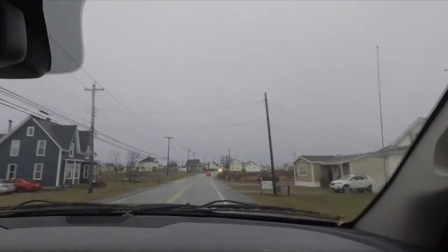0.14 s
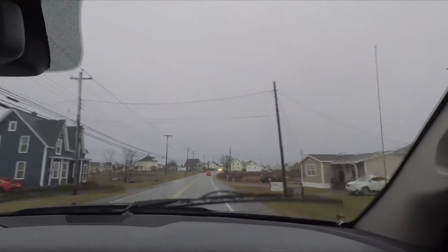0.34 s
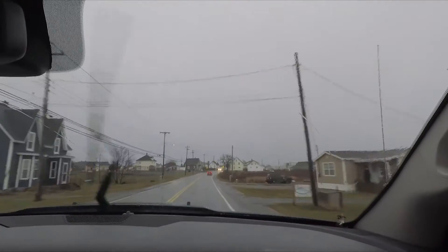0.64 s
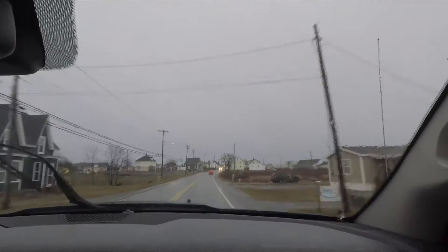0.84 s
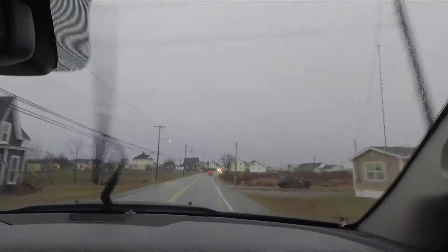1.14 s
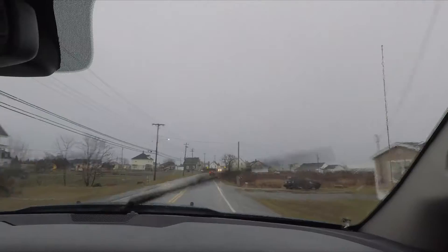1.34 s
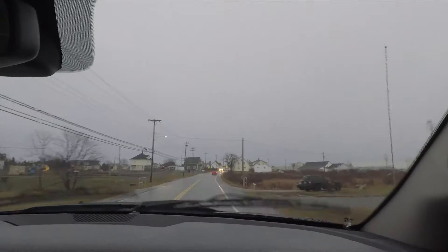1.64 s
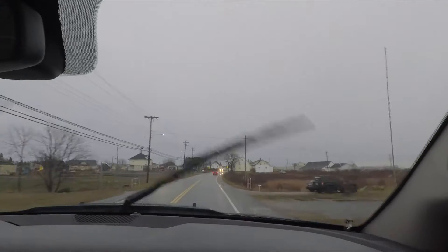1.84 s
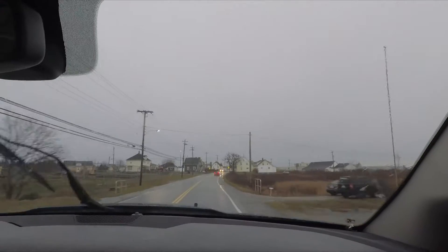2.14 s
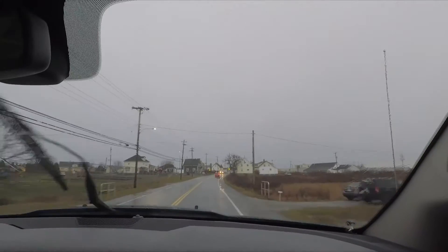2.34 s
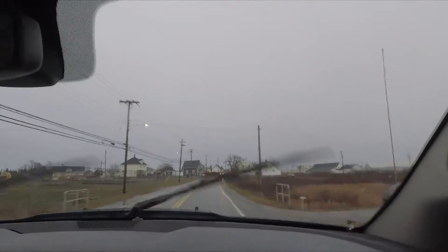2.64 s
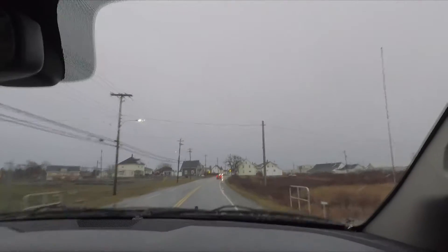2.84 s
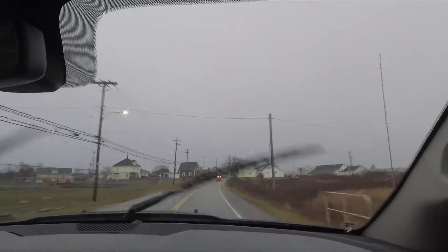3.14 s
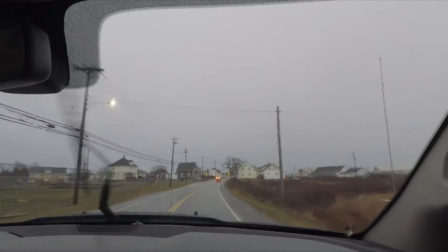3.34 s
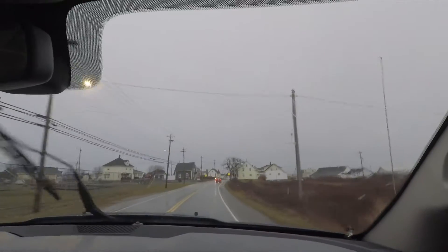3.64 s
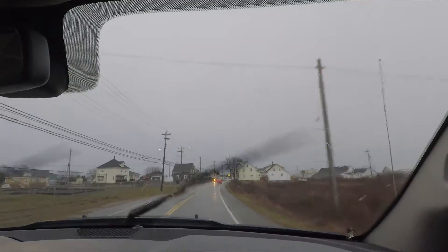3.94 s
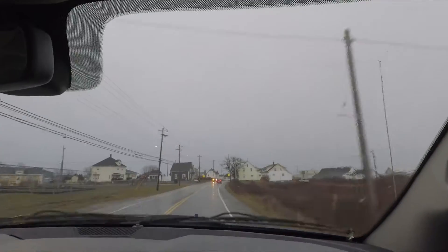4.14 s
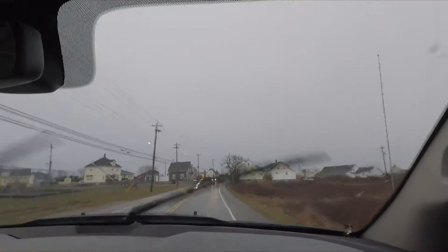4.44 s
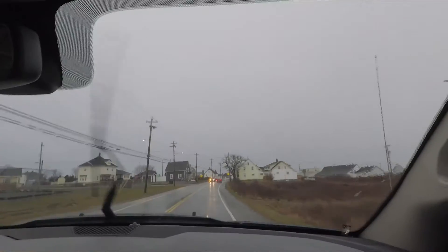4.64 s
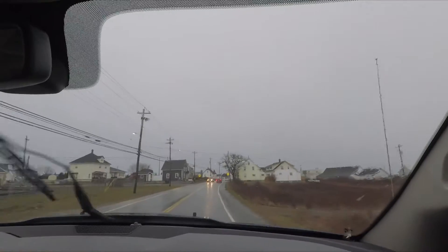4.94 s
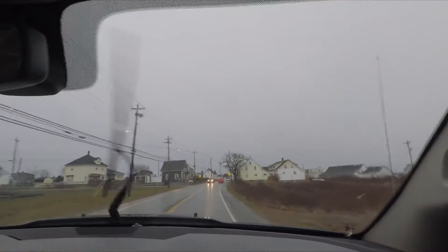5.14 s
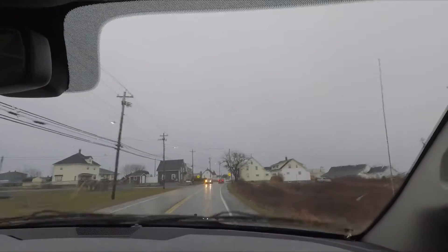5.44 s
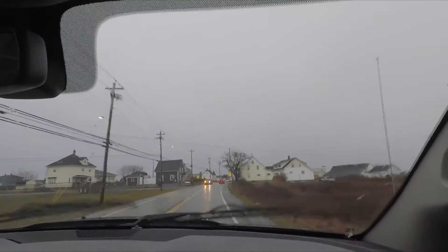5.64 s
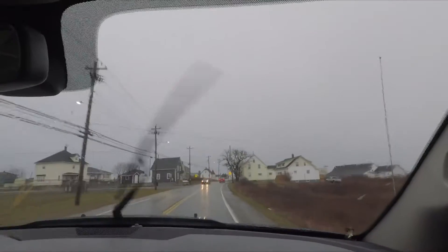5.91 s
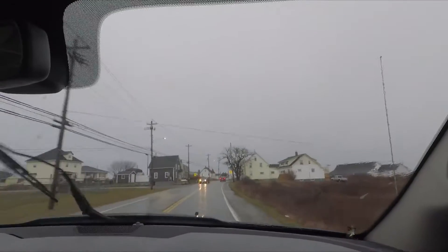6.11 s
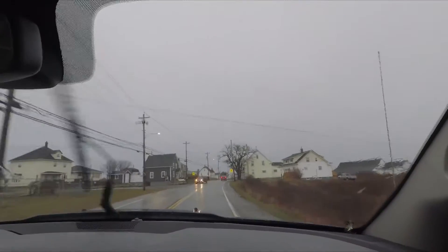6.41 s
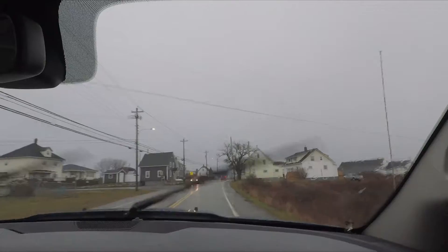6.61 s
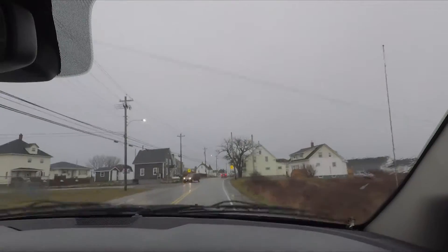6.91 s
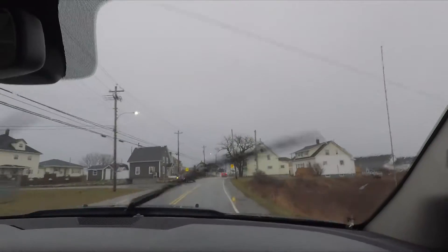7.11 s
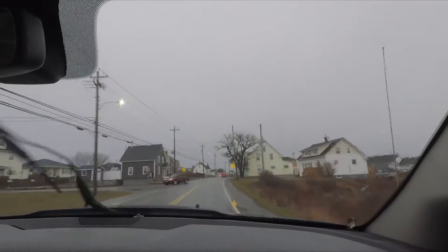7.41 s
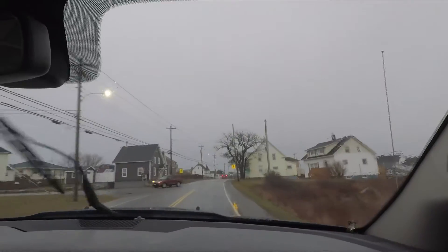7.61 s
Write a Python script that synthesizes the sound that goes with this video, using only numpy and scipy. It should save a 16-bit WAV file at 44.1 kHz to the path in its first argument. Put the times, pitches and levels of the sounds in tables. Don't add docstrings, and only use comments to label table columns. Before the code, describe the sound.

Close stereo cabin sound from near the windscreen: uneven rain crackles on glass in bursts and tiny lulls, with heavy drops popping out in front and softer ones on the side windows. Below it, constant low rumble, muted engine drone and thin wet-tyre hiss. One strong hollow knock comes early, fainter knocks follow, and a rough patch late on brings several quick body thuds.

```python
import sys
import numpy as np
from scipy import signal
from scipy.io import wavfile
from scipy.ndimage import uniform_filter1d

SR = 44100
rng = np.random.default_rng(int(sys.argv[2]) if len(sys.argv) > 2 else 0)


def persist_wave(psi):
    counts = np.round(np.clip(psi, -1, 1) * 32767).astype(np.int16)
    wavfile.write(sys.argv[1], SR, np.atleast_2d(counts).T)


def how_loud(loudness_db):
    steps = np.asarray(loudness_db, float) / 20
    return 10 ** steps


N = 342636

# start_s, rumble_db, roar_db
DRIVE = [(0.0, -16, -25), (0.24, -14.5, -29.5), (0.5, -17, -27), (0.65, -19.5, -29), (2.08, -16.5, -29),
         (2.38, -16.5, -29.5), (2.88, -15, -30.5), (3.35, -17.5, -28), (3.4, -15.5, -29.5),
         (4.48, -18.5, -29.5), (4.57, -19, -32.5), (4.65, -16, -29.5), (6.54, -17, -30), (6.62, -18, -29),
         (6.71, -14.5, -30), (7.53, -18.5, -29), (7.66, -12, -29), (7.77, -31, -30)]
# start_s, peak_db, left_minus_right_db, brightness_db
WINDSCREEN_DROPS = [(0.137, -8, 0, -2.5), (0.4682, -26, 0.5, -1.5), (0.6601, -18, -0.5, -3),
                    (0.7525, -18.5, 1, -2), (0.8277, -14.5, -5, -15.5), (0.8707, -17, -3, -4.5),
                    (1.2052, -16, 3.5, -4.5), (1.3521, -10.5, 0, -9.5), (1.4814, -10.5, -4, -7.5),
                    (1.6708, -21, 1.5, 0), (1.7896, -18, 0, -1.5), (1.9366, -20.5, 0.5, -5),
                    (2.1911, -19.5, -2, -11), (2.2563, -14, -5, -18), (2.5126, -19.5, -3, -4.5),
                    (2.6764, -17.5, -1, -11.5), (2.746, -10, 0.5, -0.5), (3.016, -17.5, 2, -11),
                    (3.3933, -14, 0.5, -15.5), (4.041, -19.5, 5, -3.5), (4.3442, -17.5, -0.5, -4.5),
                    (4.5077, -18, -5.5, -7), (4.9913, -18.5, -2, -5.5), (5.4008, -21, 7, -11.5),
                    (5.639, -15.5, -2, -12), (5.7982, -22.5, 9, -3.5), (6.2015, -17.5, -2.5, -6),
                    (6.917, -17.5, -4.5, -9.5), (7.25, -17.5, -2.5, -8), (7.4277, -19, 1.5, -12)]
# start_s, peak_db, left_minus_right_db
SIDE_DROPS = [(0.2089, -22.5, -1.0), (0.2663, -34.5, 1.0), (0.5225, -18, 1.0), (1.0829, -17, -2),
              (1.1308, -21, 1.0), (1.4112, -21, 0.0), (1.5549, -20, 0.0), (2.0412, -20, -1),
              (2.2958, -15.5, -0.5), (2.3857, -20, -1), (2.9143, -24, 2.0), (3.243, -20.5, 1.0),
              (3.46, -20, 0.5), (3.6214, -22, -3), (3.7938, -19, -4), (3.894, -24, -2), (4.2355, -20.5, -4),
              (4.4288, -21, 1.5), (4.643, -27, -2), (4.8905, -20.5, -4), (5.222, -28, 0.5),
              (5.456, -18, 1.5), (5.5756, -20.5, -1), (6.0122, -27.5, 9), (6.1459, -20.5, -1),
              (6.2567, -26.5, -3), (6.6143, -20, -4), (6.7503, -18.5, 0.5), (6.9729, -17.5, -1),
              (7.3118, -20.5, -0.5)]


def rms_one(x):
    return x / np.sqrt(np.mean(x ** 2) + 1e-20)


def in_time(rows):
    s, *columns = np.transpose(rows)
    return [np.interp(np.arange(N) / SR, s, c) for c in columns]


def at_hz(points, hz):
    table_hz, value = np.transpose(points)
    return np.interp(np.log(hz), np.log(table_hz + 1), value)


def swells(rows):
    t = np.arange(N) / SR
    return sum(db * np.exp(-((t - s) / length_s) ** 2) for s, db, length_s in rows)


def drift(rate):
    r = np.exp(-80 * np.pi * rate / SR)
    noise = rng.standard_normal(N // 40 + 2002)
    slow = signal.lfilter([1], [1, -2 * r, r * r], noise)[2000:]
    return np.interp(np.arange(N) / 40, np.arange(len(slow)), rms_one(slow))


def ports_db(left_minus_right_db):
    return left_minus_right_db * np.array([[.5], [-.5]])


def add(out, s, sound):
    start = int(s * SR)
    out[:, start:start + sound.shape[1]] += sound[:, :N - start]


def bands(spectrum, size, envelope, count=3):
    # band_hz, side_minus_mid_db
    width_db = [(15, -14), (35, -10.5), (52, -6), (65, 3), (120, -20), (300, -13.5), (510, -10.5),
                (870, -2), (1480, -.5), (2530, -4), (4320, -8), (6500, -1.5), (8500, 5.5), (13000, 4)]
    # band_hz, left_minus_right_db
    balance_db = [(15, -7.5), (35, -8.5), (45, -0.5), (55, 0.5), (70, 1), (300, 2.5), (870, -0.5),
                  (2530, -.5), (4320, 1), (6500, 1), (8500, -7), (11000, 9.5)]
    edges = spectrum[0][0] * 2 ** (np.arange(40) / count)
    edges = edges[edges < min(spectrum[-1][0] * 1.2, .45 * SR)]
    white = rng.standard_normal((2, 2, size))
    out = 0
    for k, (low, high) in enumerate(zip(edges, edges[1:])):
        hz = np.sqrt(low * high)
        sos = signal.butter(2, [low, high], "band", fs=SR, output="sos")
        mid, side = signal.sosfilt(sos, white[k % 2] * envelope(hz))
        ports = mid + how_loud(at_hz(width_db, hz)) * side * [[1], [-1]]
        out = out + how_loud(at_hz(spectrum, hz)) * ports * how_loud(ports_db(at_hz(balance_db, hz)))
    return out


def steady(spectrum, patchy_db, rate):
    together = drift(rate)
    return rms_one(bands(spectrum, size=N, envelope=lambda hz: how_loud(patchy_db * (0.11 * together + drift(rate)))))


def body_rumble():
    # band_hz, density_db_per_hz
    rumble_spectrum = [(11, -27), (15, 1.5), (25, -4), (35, 4.5), (50, -2.5), (62, -1), (75, -3.5),
                       (90, -0.5), (105, -6.5), (125, -3.5), (150, -12), (200, -35), (260, -23)]
    rumble_db, _ = in_time(DRIVE)
    return how_loud(rumble_db + 1.0) * steady(rumble_spectrum, patchy_db=1.93, rate=4.3)


def road_roar():
    # band_hz, density_db_per_hz
    roar_spectrum = [(59, -32.5), (100, 0), (133, -7.5), (210, -12.5), (330, -16), (584, -27.5), (776, -29),
                     (989, -36.5), (1490, -41), (3000, -48), (3900, -66.5), (6600, -120)]
    # centre_s, rise_db, length_s
    jolts = [
        (6.73, 8, .05),
        (7.16, 6.5, .05),
    ]
    _, roar_db = in_time(DRIVE)
    return how_loud(roar_db + 5.5 + swells(jolts)) * steady(roar_spectrum, patchy_db=1.2, rate=15.0)


def spray():
    # band_hz, density_db_per_hz
    spray_spectrum = [(2000, -11), (4000, -1.5), (6200, -2), (8000, -4), (10000, -6.5), (12500, -23.5),
                      (15000, -30)]
    return how_loud(-52) * steady(spray_spectrum, patchy_db=3.0, rate=8.7)


def engine():
    # start_s, firing_hz, level_db
    firing = [(0, 63.4, -24.5), (1.0, 63.3, -21), (2.2, 63, -24), (3.5, 63.13, -28), (5.0, 63.1, -20.5),
              (6.5, 62.62, -36.5), (7.77, 62, -27.5)]
    # start_s, boom_hz, level_db
    boom = [(0.0, 123.8, -31), (0.97, 124.4, -19.5), (1.23, 116.1, -30), (1.67, 125.6, -20),
            (1.77, 116.2, -25.5), (1.9, 126.7, -19), (2.49, 127.3, -34), (3.22, 116.3, -26.5),
            (3.4, 121, -22), (5.52, 125.3, -21), (7.66, 112, -19), (7.77, 116, -20.5)]
    flutter_db = 2.5
    out = 0
    for table, wander_hz in ((firing, .8), (boom, 2.76)):
        hz, level_db = in_time(table)
        phase = 2 * np.pi * np.cumsum(hz + wander_hz * drift(5.52)) / SR
        out = out + how_loud(level_db + 2.5 + flutter_db * drift(5.4)) * np.sin(phase)
    return out * how_loud(ports_db(1.8))


def tap(splat_t60, cabin_db, spread_s):
    # band_hz, density_db_per_hz
    glass_spectrum = [(500, -19.5), (700, 0), (1500, -4), (2200, -1.5), (2850, 1), (3500, 3.5), (4400, -2),
                      (5800, 1.5), (6600, -1), (7600, -10.5), (9700, -25.5), (11200, -47), (13000, -35),
                      (16000, -59.5)]
    # band_hz, t60_s
    cabin_t60 = [(800, 0.17), (2600, 0.083), (7000, 0.039), (14000, .07)]
    t = np.arange(int(.16 * SR)) / SR
    ticks = np.repeat(how_loud(5.4 * rng.standard_normal(len(t) // 20 + 1)), 20)[:len(t)]
    splat = ticks * how_loud(-60 * t / splat_t60) * (1 - np.exp(-t / spread_s))
    build_up = 1 - np.exp(-t / 0.0099)

    def shape(hz):
        return splat + how_loud(cabin_db - 60 * t / at_hz(cabin_t60, hz)) * build_up

    sound = bands(glass_spectrum, size=len(t), envelope=shape, count=5)
    return sound / np.mean(np.max(np.abs(sound), axis=1))


def middling_drops(patter_db):
    per_s, clearing_db, clearing_s = 18, 20, .02
    count = int(per_s * N / SR)
    listed = [*WINDSCREEN_DROPS, *SIDE_DROPS]
    clearings = swells([(row[0] - clearing_s / 2, clearing_db, clearing_s) for row in listed])
    flow = np.cumsum(how_loud(patter_db - uniform_filter1d(patter_db, size=SR // 2) - clearings))
    at = np.searchsorted(flow, (np.arange(count) + rng.random(count)) / count * flow[-1])
    size, side, bright = np.clip(rng.standard_normal((count, 3)), -2, 1).T
    peak_db = patter_db[at] + 11.5 + 3.5 * size
    return np.transpose([at / SR, peak_db, 1.5 + 3 * side, -9 + 6 * bright])


def rain():
    # start_s, patter_db
    thickness = [(0.0, -38), (0.34, -39.5), (0.73, -37.5), (0.82, -39.5), (1.45, -40), (2.01, -38),
                 (2.51, -44), (3.33, -41), (4.02, -44), (4.5, -41.5), (4.67, -42.5), (6.17, -40),
                 (6.56, -43.5), (6.9, -42), (7.25, -44.5), (7.77, -43)]
    # centre_s, depth_db
    lulls = [(.125, 8), (0.224, 8), (.396, 6), (.693, 9), (0.959, 14), (1.317, 5), (1.447, 5), (1.611, 12),
             (1.655, 6), (1.92, 6), (2.076, 5.5), (2.357, 8), (2.73, 7), (2.988, 6), (3.515, 6), (3.976, 8),
             (4.22, 9.5), (4.749, 11), (5.333, 7), (5.719, 9), (5.917, 15), (6.182, 7), (6.376, 13),
             (6.555, 12), (6.655, 8), (6.888, 7), (7.235, 7), (7.373, 20), (7.448, 11)]
    lull_s, lull_lead_s, side_bright_db = .022, .013, -10.5
    spots = [tap(splat_t60=0.027, cabin_db=-4.5, spread_s=0.00019 * how_loud(20.0 * u)) for u in np.linspace(-1, 1, 16)]
    near = [tap(splat_t60=0.017, cabin_db=-3.0, spread_s=0.0001) for _ in range(8)]

    patter_db, = in_time(thickness)
    patter_db = patter_db + 3.5 - swells([(s - lull_lead_s, db, lull_s) for s, db in lulls])
    falls = rng.random(N) < 380 * how_loud(1.5 * drift(12.0)) / SR
    sizes = falls * how_loud(3.5 * np.minimum(rng.exponential(1, N), 3.5))
    patter = rms_one(sizes) * how_loud(patter_db - 14.0)
    dealt = rng.integers(0, 16, N)
    out = sum(signal.fftconvolve([patter * (dealt == k)], spot, axes=1)[:, :N] for k, spot in enumerate(spots))

    side_drops = [(*row, side_bright_db) for row in SIDE_DROPS]
    middling = middling_drops(patter_db)
    for drops, struck in ((WINDSCREEN_DROPS, near), (side_drops, spots), (middling, spots[:8] + near)):
        treble = signal.sosfilt(signal.butter(2, 4800, "high", fs=SR, output="sos"), struck)
        bass = signal.sosfilt(signal.butter(2, 4800, "low", fs=SR, output="sos"), struck)
        for (s, peak_db, pan_db, bright_db), k in zip(drops, rng.integers(0, len(struck), len(drops))):
            sound = bass[k] * how_loud(-.4 * (bright_db + 11.0)) - treble[k] * how_loud(0.7 * (bright_db + 9.5))
            add(out, s, sound * how_loud(peak_db - 1.75 + ports_db(pan_db)))
    return out


def roof():
    # start_s, peak_db
    roof_drops = [(0.058, -12), (0.139, -39), (0.509, -18), (0.713, -13.5), (2.676, -16.5), (2.963, -16),
                  (3.582, -22.5), (4.943, -23.5), (5.812, -18.5), (6.742, -22.5), (7.168, -35), (7.43, -20)]
    # band_hz, density_db_per_hz
    lining_spectrum = [(300, -16), (450, 0), (900, -8.5), (1400, -8), (2000, -15), (2600, -37.5)]
    out = np.zeros((2, N))
    t = np.arange(int(.1 * SR)) / SR
    for s, peak_db in roof_drops:
        pat = bands(lining_spectrum, size=len(t), envelope=lambda hz: how_loud(-60 * t / 0.083))
        add(out, s, how_loud(peak_db - 6.5) * pat / np.max(np.abs(pat)))
    return out


def ring(clicks, hz, t60):
    r, w = how_loud(-60 / (t60 * SR)), 2 * np.pi * hz / SR
    return signal.lfilter([0, np.sin(w)], [1, -2 * r * np.cos(w), r * r], clicks + 1e-18)


def mount():
    # start_s, peak_db
    knocks = [
        (0.9124, -3),
        (3.146, -20.5),
        (4.014, -11.5),
        (5.869, -12),
        (6.339, -29.5),
        (6.484, -25),
        (6.821, -12.5),
    ]
    # mode_hz, level_db, t60_s, far_port_share
    modes = [(105, -3.5, 0.12, -1.4), (141, -3, 0.06, -2), (320.5, 4.5, 0.066, 0.0024),
             (400, -11, 0.047, 0.1), (490, -19, 0.073, 0.34)]
    clicks = np.zeros(N)
    clicks[[int(s * SR) for s, db in knocks]] = how_loud(np.array(knocks)[:, 1] - 1.0)
    soft = signal.lfilter(np.hanning(70) / 35, [1], clicks)
    return sum(how_loud(db) * ring(soft, hz, t60) * [[1], [far]] for hz, db, t60, far in modes)


def bumps():
    # start_s, peak_db, ring_hz, swell_s
    thuds = [(6.69, -14, 83.5, 0.069), (6.703, -21.5, 274, 0.04), (6.743, -21, 91.3, 0.039),
             (6.801, -17.5, 159.3, 0.046), (7.11, -12.5, 164.8, 0.042), (7.134, -10.5, 262, 0.0073),
             (7.158, -11, 154.6, 0.016), (7.174, -17, 263.6, 0.026), (7.201, -21, 137, 0.035),
             (4.895, -21.5, 341.4, 0.016), (2.238, -18.5, 157, 0.041), (5.69, -19.5, 172, 0.024)]
    out = np.zeros((2, N))
    t = np.arange(int(.2 * SR)) / SR
    for s, peak_db, hz, swell_s in thuds:
        shape = t / swell_s * 2 * np.exp(1 - t / swell_s * 2)
        add(out, s, np.sin(2 * np.pi * hz * t) * shape * how_loud(peak_db + ports_db(1.6)))
    return out


def scene():
    vehicle = body_rumble() + road_roar() + spray() + engine()
    return vehicle + rain() + roof() + mount() + bumps()


def band_limit(x):
    return signal.sosfilt(signal.butter(12, 15800, fs=SR, output="sos"), x)


def record(dry):
    squeeze, response_s = 0.033, 0.039
    r = np.exp(-1 / (response_s * SR))
    power = signal.lfilter([1 - r], [1, -r], np.mean(dry ** 2, axis=0), zi=[.03])[0]
    held = dry * how_loud(-squeeze * (10 * np.log10(power + 1e-9) + 15.5))
    rounded = 0.93 * np.tanh(held / 0.96)
    return band_limit(rounded)


dry = scene()
out = record(dry)
persist_wave(out)
```